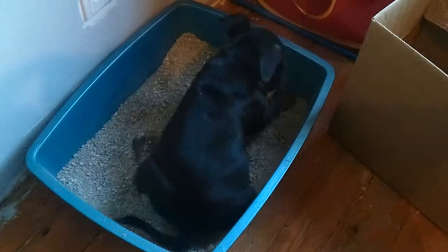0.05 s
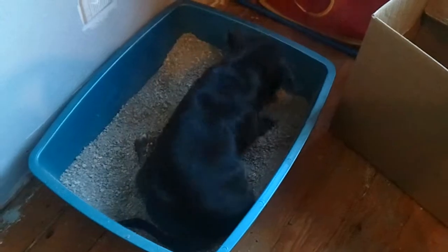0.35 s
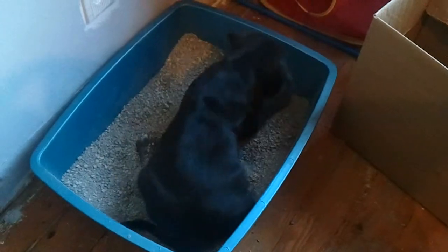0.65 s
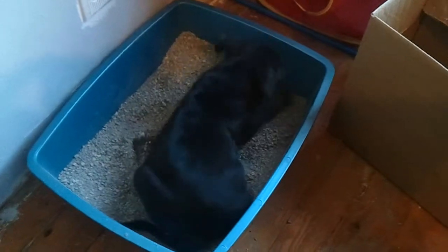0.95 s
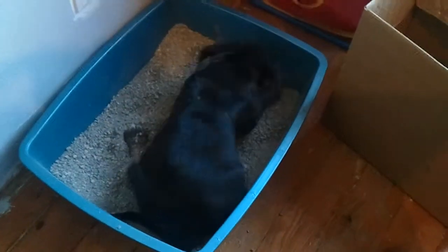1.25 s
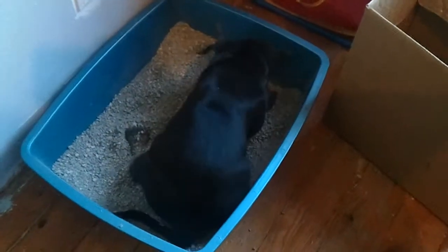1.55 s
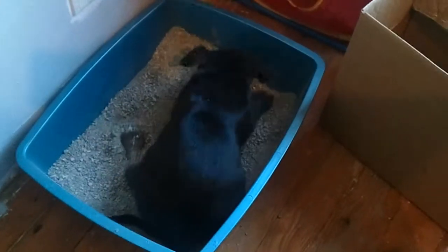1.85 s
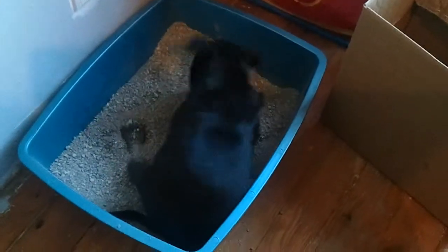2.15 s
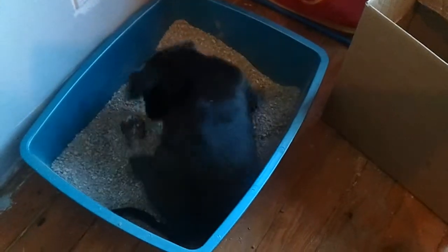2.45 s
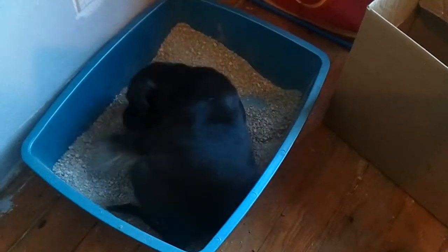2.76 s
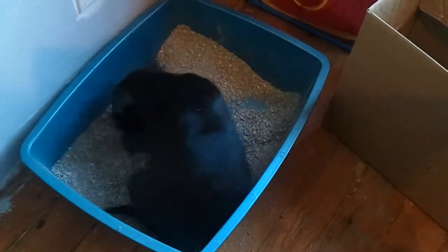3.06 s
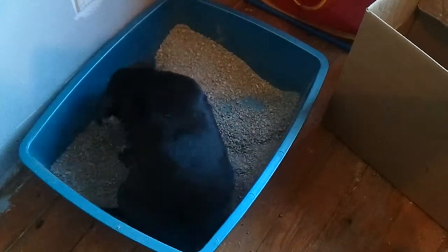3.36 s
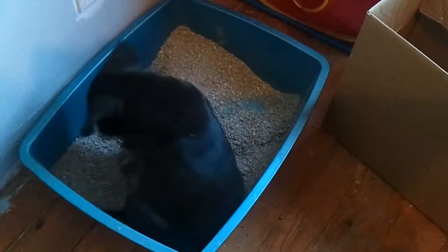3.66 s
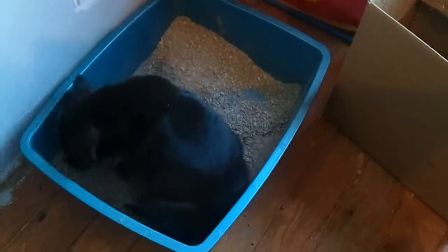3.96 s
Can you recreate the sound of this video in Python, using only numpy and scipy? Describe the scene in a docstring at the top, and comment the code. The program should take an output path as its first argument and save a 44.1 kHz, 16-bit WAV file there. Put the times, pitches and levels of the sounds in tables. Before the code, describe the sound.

Gritty scraping and crunching runs throughout as a small dog paws litter in a plastic tub. Strokes come quickly and loudest in the first second, with sharp knocks on the plastic near 0.1 and 0.4 seconds and a few faint claw squeaks. A duller bump comes at about 2.1 seconds, then the scratching is softer and sparser until 4 seconds. An appliance hums steadily in the room.

```python
"""Gritty scraping and crunching: a small dog paws through granular litter in a plastic tub.
Each stroke rubs the tub, crunches granules together and sets loose grains hissing.
Now and then a claw or a leg knocks the plastic, or a claw cracks granules or squeaks over grit.
An appliance hums in the quiet room. The microphone is narrow-band."""
import sys
import numpy as np
from scipy import signal
from scipy.fft import rfft, irfft
from scipy.io import wavfile

SR = 44100
rng = np.random.default_rng(int(sys.argv[2]) if len(sys.argv) > 2 else 0)


def inscribe(sig):
    """Save sig as 16-bit PCM at rate SR to the path in sys.argv[1].

    A 1-D sig is mono; a 2-D sig holds one channel per row.
    Samples are clipped to [-1, 1] before scaling.
    """
    pcm = np.round(np.clip(np.atleast_2d(sig).T, -1, 1) * 32767)
    wavfile.write(sys.argv[1], SR, pcm.astype(np.int16))


N = 176400
T, HZ = np.arange(N) / SR, np.fft.rfftfreq(N, 1 / SR)


def amp(db):
    """dB to gain."""
    return 10 ** (np.asarray(db) / 20)


def unit(x):
    """Scale to rms 1."""
    return x / np.sqrt(np.mean(x ** 2) + 1e-20)


def spectrum_db(points):
    """Interpolate (f/Hz, level/dB) points over log frequency."""
    hz, db = np.transpose(points)
    return np.interp(np.log(HZ + 1), np.log(hz), db)


def colour(x, db):
    """Minimum-phase filter with gain curve db; output rms 1."""
    cepstrum = irfft(np.log(amp(db)), N)
    cepstrum[1:N // 2] *= 2
    cepstrum[N // 2 + 1:] = 0
    return unit(irfft(rfft(x) * np.exp(rfft(cepstrum)), N))


def drift(rate_hz):
    """Slow random motion, rms 1."""
    return unit(irfft(rfft(rng.standard_normal(N)) * np.exp(-(HZ / rate_hz) ** 2), N))


def add(mix, start_s, sound):
    """Mix sound in at start_s."""
    part = mix[round(start_s * SR):][:len(sound)]
    part += sound[:len(part)]


# Paw strokes: peak t/s, rise/s, fall/s, then relative level/dB of rub, crunch, hiss
STROKES = [(0.049, 0.029, 0.04, -31.5, -31, -36.5), (0.0695, 0.00071, 0.018, -32.5, -22.5, -21),
           (.085, 0.017, .075, -25, -27, -22.5), (0.171, 0.025, 0.05, -26.5, -28, -28),
           (0.269, 0.034, 0.2, -26, -31, -29.5), (.329, .085, .06, -33.5, -23.5, -23),
           (0.415, .01, 0.035, -27.5, -31, -32), (0.566, .021, 0.052, -30.5, -25.5, -28.5),
           (0.613, 0.0057, .125, -29.5, -26.5, -23.5), (0.821, .02, 0.19, -30, -30, -31),
           (0.993, 0.031, 0.05, -35.5, -29, -32.5), (1.117, 0.008, .013, -32, -28, -28.5),
           (1.19, .1, .1, -35.5, -30.5, -31), (1.294, 0.047, 0.09, -29.5, -30, -31),
           (1.441, .04, 0.11, -35, -37, -33.5), (1.5, 0.017, 0.045, -47, -27.5, -30.5),
           (1.55, 0.026, 0.03, -31, -29, -26.5), (1.666, 0.048, .023, -39, -25.5, -30.5),
           (1.697, 0.019, 0.1, -32, -29.5, -28.5), (2.092, 0.035, .083, -31.5, -32.5, -27),
           (2.314, 0.088, 0.11, -42, -37.5, -43), (2.508, 0.076, 0.06, -37, -39, -42),
           (2.592, 0.041, 0.17, -35.5, -32.5, -34), (2.757, 0.014, 0.25, -36.5, -37, -43),
           (2.908, 0.012, 0.046, -40.5, -30, -24.5), (3.085, 0.022, 0.032, -33, -36, -41),
           (3.26, 0.042, .09, -34, -35, -40), (3.505, .022, .105, -35, -33.5, -33),
           (3.748, 0.049, .096, -35, -34, -37), (3.957, 0.018, 0.15, -29, -33.5, -33)]
# Spectra of rub, crunch and hiss: f/Hz, relative level/dB
RUB_SPECTRUM = [(100, -3.5), (280, -14.5), (380, -10.5), (440, -4), (700, -1.5), (900, -4.5), (1200, -23),
                (2500, -48.5)]
CRUNCH_SPECTRUM = [(300, -13.5), (750, -10), (950, -3.5), (1150, -2), (1500, -3), (2200, -3.5),
                   (2800, -3.5), (4000, -8.5), (8000, -46.5)]
HISS_SPECTRUM = [(800, -24.5), (2200, -11.5), (2900, -0.5), (3500, -2), (4500, -1.5), (5400, -1.5),
                 (6400, -1.5), (7000, -7), (7500, -17.5)]
def litter():
    """Rub of the tub floor, crunch of pressed granules, hiss of loose ones."""
    peak_s, rise_s, fall_s, *levels_db = np.transpose(STROKES)
    rub_env, crunch_env, hiss_env = (stroke_envelope(peak_s, rise_s, fall_s, db) for db in levels_db)
    rub = granules(rub_env, RUB_SPECTRUM, density=.3, slip_db=2.0)
    crunch = granules(crunch_env, CRUNCH_SPECTRUM, density=.9, slip_db=.54)
    hiss = granules(hiss_env, HISS_SPECTRUM, density=1.4, slip_db=.73)
    return amp(-.3) * rub + amp(.22) * crunch + amp(-1.34) * hiss


def stroke_envelope(peak_s, rise_s, fall_s, levels_db):
    """Each stroke swells, then dies away as the grains settle; powers add."""
    power = np.zeros(N)
    for peak, rise, fall, db in zip(peak_s, rise_s, fall_s, levels_db):
        age_s = T - peak
        power += amp(db) ** 2 * np.exp(-np.where(age_s < 0, (age_s / rise) ** 2, 2 * age_s / fall))
    return np.sqrt(power)


# Tub resonances that colour the scraping: f/Hz, width/Hz, boost/dB
TUB_RESONANCES = [(431, 36, 5.5), (490, 69, -0.5), (567, 140, 4), (766, 180, -4.5), (856, 72, 7.5),
                  (1113, 120, 5.5), (1380, 150, 1.5), (1633, 53, 6.5), (2060, 270, 2), (2845, 290, -4),
                  (3400, 60, 0)]
def granules(envelope, spectrum, density, slip_db, base_per_s=9000, full_stroke_db=-27.5, spread_db=3):
    """Tiny collisions, denser under a harder push, louder in slips, heard through the tub."""
    rate_per_s = base_per_s * density * (.3 + envelope / amp(full_stroke_db))
    chance = np.clip(rate_per_s / SR, 1e-4, 1)
    size = amp(spread_db * np.minimum(rng.exponential(1, N), 4)) * rng.choice([-1, 1], N)
    clicks = size * (rng.random(N) < chance) / np.sqrt(chance)  # power independent of rate
    clicks *= amp(slip_db * slips())
    tub_db = sum(db / (1 + (2 * (HZ - hz) / width_hz) ** 2) for hz, width_hz, db in TUB_RESONANCES)
    return envelope * colour(clicks, spectrum_db(spectrum) + tub_db)


def slips(rate_per_s=100, decay_s=.0096):
    """Small avalanches: heaps give way at once and trickle to rest."""
    starts = rng.exponential(1, N) * (rng.random(N) < rate_per_s / SR)
    flow = signal.lfilter([1], [1, -np.exp(-1 / (decay_s * SR))], starts)
    return np.minimum(unit(flow - flow.mean()), 4)


# Contacts with the tub, several per bump: t/s, level/dB, centre f/Hz, ring factor
KNOCKS = [(0.0728, -4, 1020, 0.63), (0.08, -25, 1200, 0.75), (0.3894, -10.5, 490, 0.85),
          (.3896, -13, 1650, .35), (.392, -23, 170, 0.76), (.399, -21, 1100, 0.4), (.559, -14, 1690, 0.43),
          (.840, -19, 550, 1), (.851, -22, 900, 0.5), (1.116, -26.5, 1100, .5), (1.207, -23, 576, 0.79),
          (2.110, -13.5, 410, 1.54), (2.1155, -11.5, 300, 1.27), (2.121, -25, 360, 1.7),
          (2.126, -24, 220, 0.77), (2.14, -22, 378, 1.7), (3.695, -29, 140, .4)]
# Tub modes: f/Hz, relative level/dB, t60/s at ring factor 1
TUB_MODES = [(211, 8, 0.13), (351, 3, 0.2), (379.2, -2, 0.27), (436, -18, 0.1), (518, 5.5, 0.06),
             (578, -8, .11), (1075, 3, 0.1), (1130, -8.5, 0.04), (1450, -0.5, .05)]
def knocks(width_oct=.76, thud_db=-4):
    """Hard claws ring the tub's high modes, a soft leg the low ones; each starts with a dead thud."""
    out, t = np.zeros(N), T[:SR // 2]
    hz, db, t60_s = np.transpose(TUB_MODES)[:, :, None]
    for start_s, level_db, centre_hz, ring in KNOCKS:
        weight = amp(db) * np.exp(-.5 * (np.log2(hz / centre_hz) / width_oct) ** 2)
        decay = np.exp(-np.log(1000) * t / (t60_s * ring))
        modes = (weight * np.sin(2 * np.pi * hz * t) * decay).sum(0) / weight.sum()
        cycles = t * centre_hz
        thud = np.sin(2 * np.pi * cycles) * cycles * np.exp(.5 - .5 * cycles ** 2)
        add(out, start_s, amp(level_db) * (np.sqrt(ring) * modes + amp(thud_db) * thud))
    return out


# Granule cracks: t/s, level/dB, centre f/Hz
CRACKS = [(0.0685, -16, 4170), (0.609, -30, 5000), (.6125, -21.5, 5500), (.849, -19, 3500),
          (1.116, -24, 4060), (1.4903, -29, 2210), (2.897, -24, 5000)]
def cracks(decay_s=.0018, half_width_oct=.73, snaps_per_s=5600):
    """A claw bites into the litter: a tight cluster of granules snaps."""
    out, t = np.zeros(N), T[:SR // 20]
    for start_s, level_db, centre_hz in CRACKS:
        clicks = rng.standard_normal(N) * (rng.random(N) < snaps_per_s / SR)
        band_db = -20 * np.log10(1 + (np.log2((HZ + 1) / centre_hz) / half_width_oct) ** 2)
        snaps = colour(clicks, band_db)[:len(t)]
        add(out, start_s, amp(level_db) * np.exp(-t / decay_s) * snaps)
    return out


# Claw squeaks: peak t/s, sigma/s, f/Hz, level/dB
SQUEAKS = [(0.578, 0.034, 2070, -28.5), (1.438, 0.03, 4440, -35.5), (1.66, 0.01, 1585, -27)]
def squeaks(width_hz=380):
    """A claw sticks and slips over grit: narrow-band noise with a rough pitch."""
    out = np.zeros(N)
    for peak_s, sigma_s, hz, db in SQUEAKS:
        envelope = amp(db) * np.exp(-.5 * ((T - peak_s) / sigma_s) ** 2)
        band_db = -20 * np.log10(1 + (2 * (HZ - hz) / width_hz) ** 2)
        out += envelope * colour(rng.standard_normal(N), band_db)
    return out


def room(x, t60_s=.24, tail_db=-8):
    """Direct sound plus the short tail of a small furnished room."""
    t = T[:SR // 2]
    reflections = rng.standard_normal(len(t)) * (rng.random(len(t)) < .05) * (t > .003)
    tail = reflections * np.exp(-np.log(1000) * t / t60_s)
    return x + amp(tail_db) * signal.fftconvolve(x, tail / np.linalg.norm(tail))[:N]


# Hum tones: f/Hz, rms level/dB, waver depth (0-1)
HUM_TONES = [(23.7, -43, .1), (56.0, -37, .12), (57.23, -32.5, .12), (71.0, -43.5, 0.25), (114.4, -43, .1),
             (120.0, -35, 0.12), (130.3, -42.5, 0.4), (171.7, -48, .8), (940, -47, 0.8)]
def appliance_hum():
    """Motor and mains tones waver in level and phase; close pairs beat."""
    out = np.zeros(N)
    for hz, db, waver in HUM_TONES:
        phase = 2 * np.pi * hz * T
        in_phase = (1 + waver * drift(rate_hz=12)) * np.sin(phase)
        quadrature = waver * drift(rate_hz=4.1) * np.cos(phase)
        out += amp(db) * unit(in_phase + quadrature)
    return out


# Room noise spectrum: f/Hz, relative level/dB
ROOM_SPECTRUM = [(20, 7), (40, 10.5), (90, 3.5), (150, -2.5), (220, -1.5), (450, -2.5), (650, -2),
                 (780, -6.5), (900, -5), (1200, -8), (1650, -10), (2200, -14.5), (3300, -13), (5000, -15.5),
                 (6500, -15), (7500, -28)]
def room_noise(rms_db=-32.5):
    """Steady noise, strongest in the bass."""
    return amp(rms_db) * colour(rng.standard_normal(N), spectrum_db(ROOM_SPECTRUM))


def scene():
    """The dog in its tub, over hum and room noise; mono."""
    dog = litter() + knocks() + squeaks() + cracks()
    return (room(dog) + appliance_hum() + room_noise())[None]


def record(dry):
    """Microphone chain: DC offset, limited headroom, narrow band."""
    offset_fs, limit_fs, cutoff_hz = -.45, .95, 7550
    clipped = np.clip(dry + offset_fs, -limit_fs, limit_fs) - offset_fs
    lowpass = signal.firwin(401, cutoff_hz, window=("kaiser", 9), fs=SR)
    return signal.oaconvolve(clipped, lowpass[None], "same") + offset_fs


dry = scene()
out = record(dry)
inscribe(out)
```